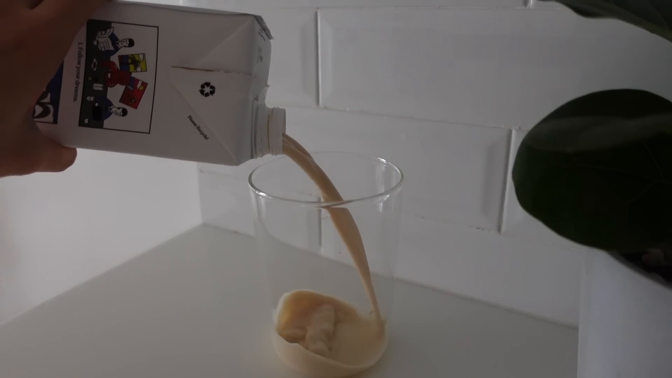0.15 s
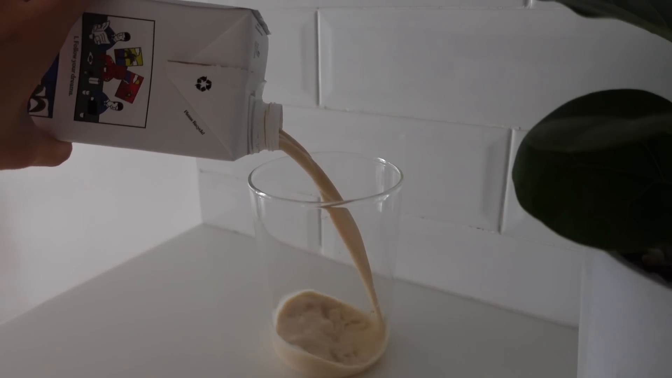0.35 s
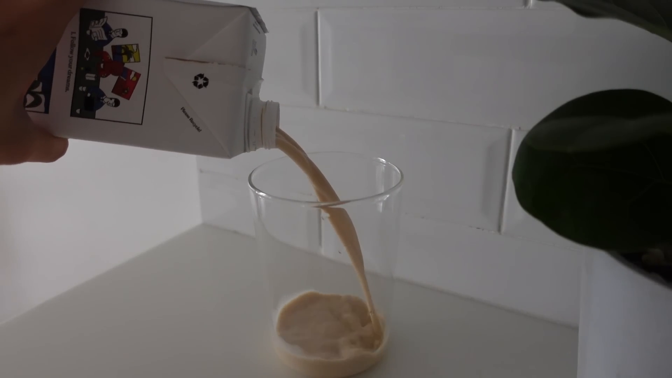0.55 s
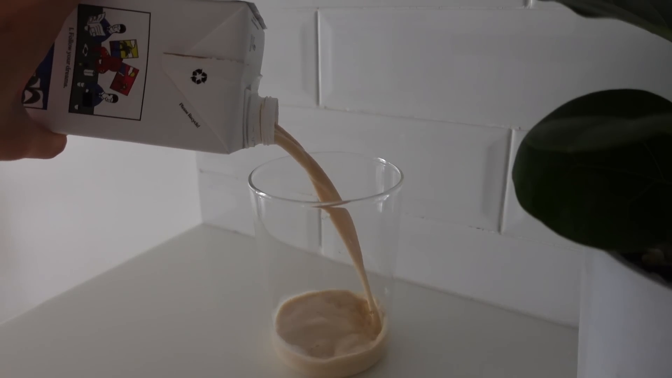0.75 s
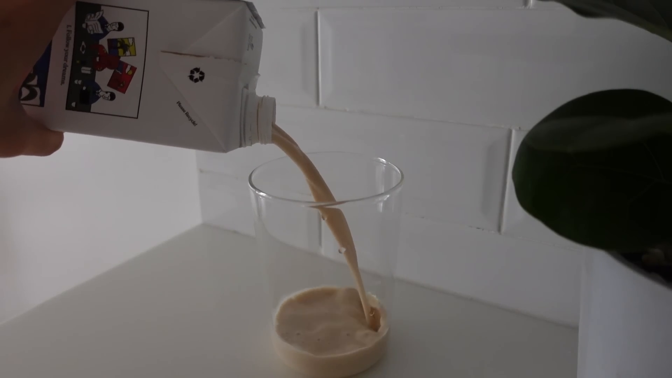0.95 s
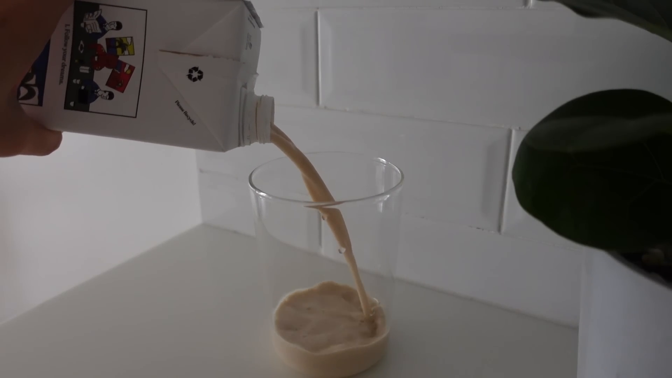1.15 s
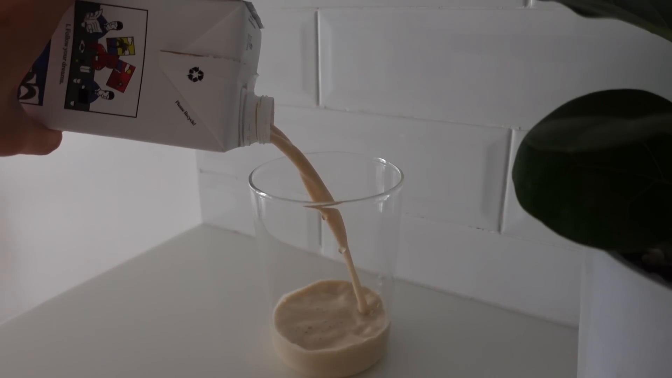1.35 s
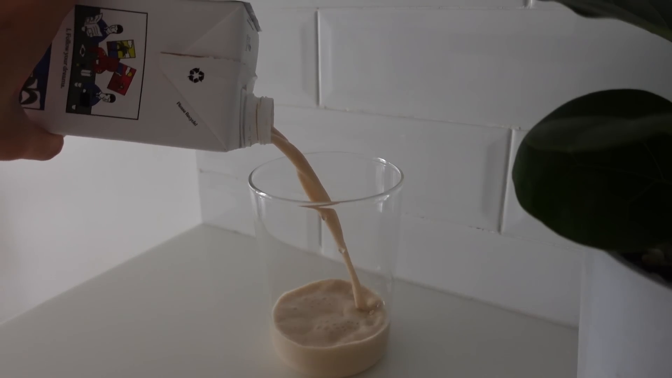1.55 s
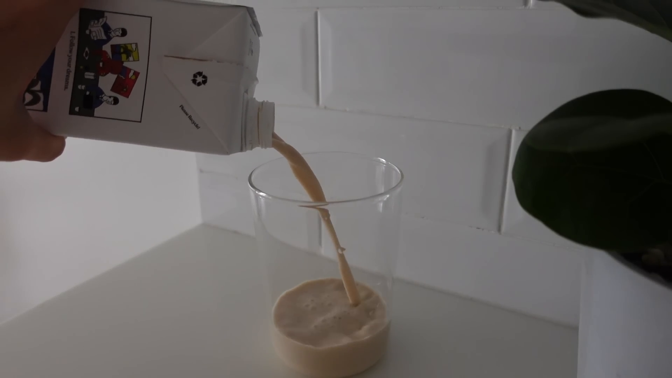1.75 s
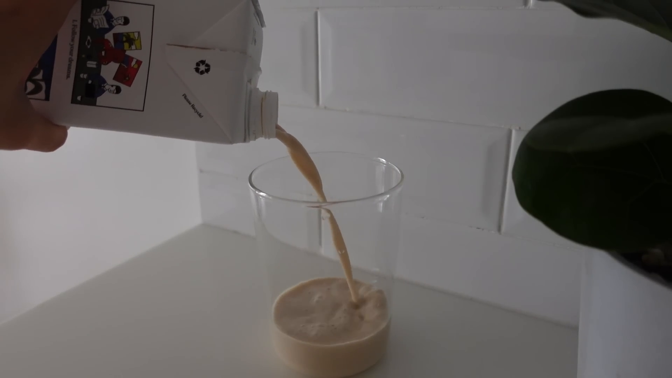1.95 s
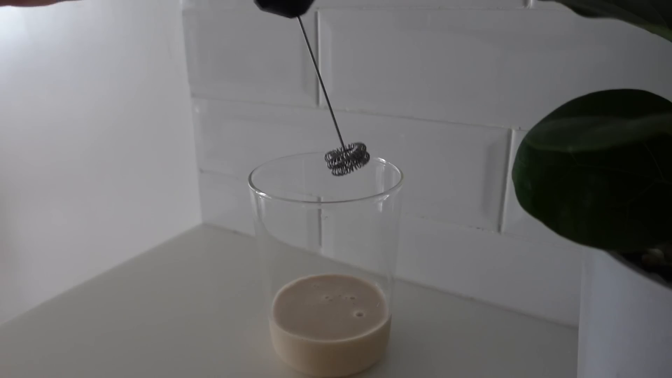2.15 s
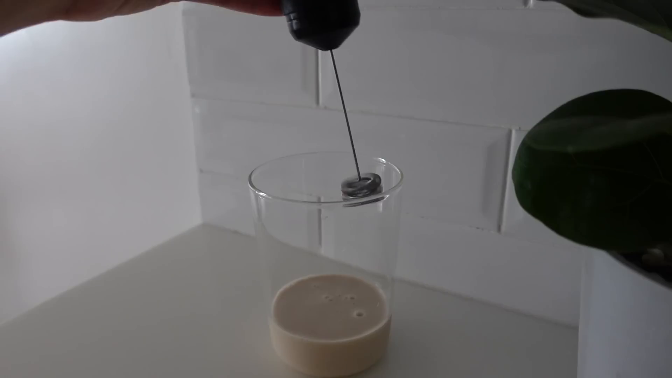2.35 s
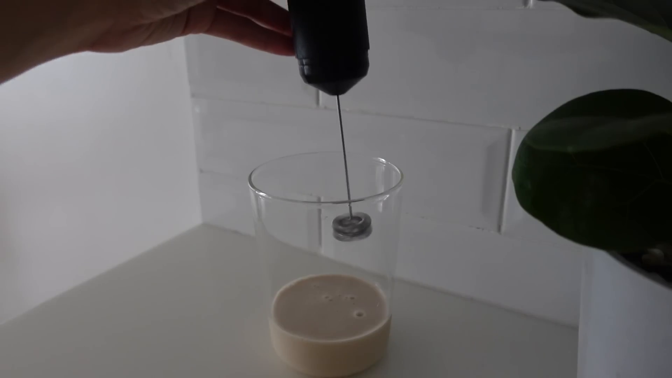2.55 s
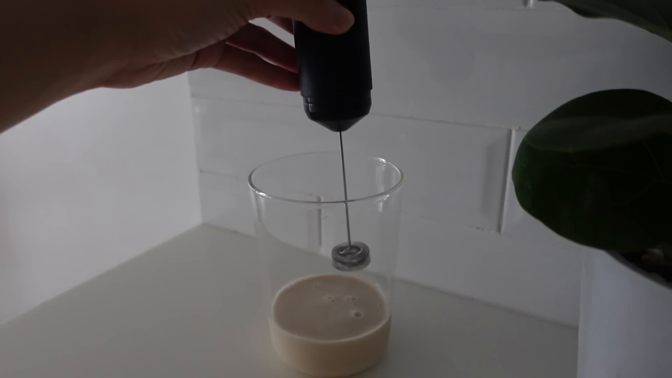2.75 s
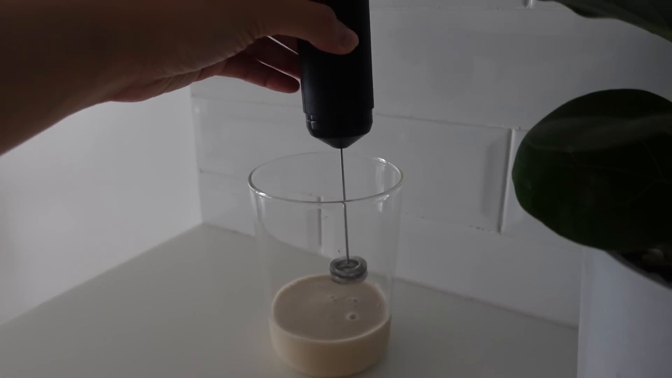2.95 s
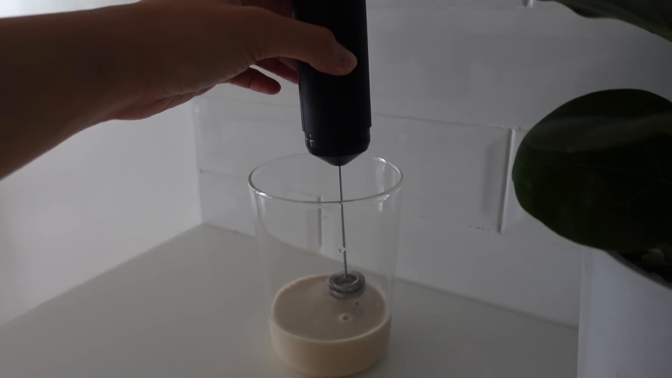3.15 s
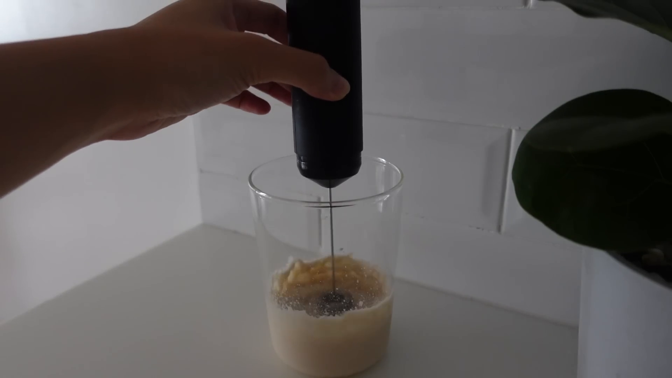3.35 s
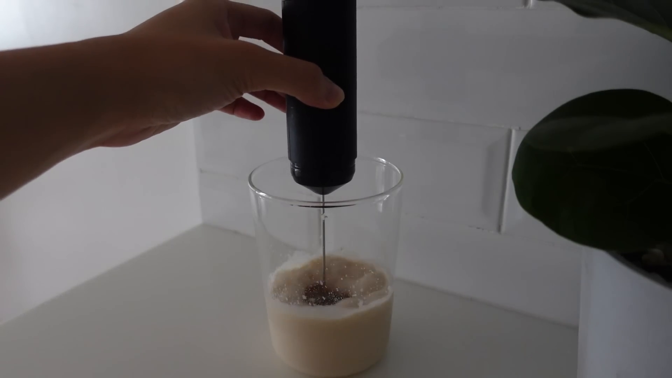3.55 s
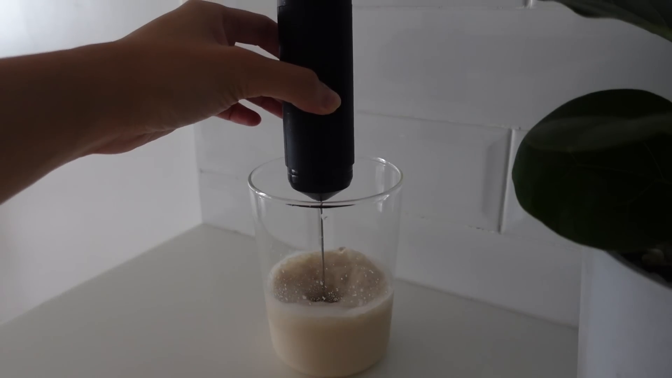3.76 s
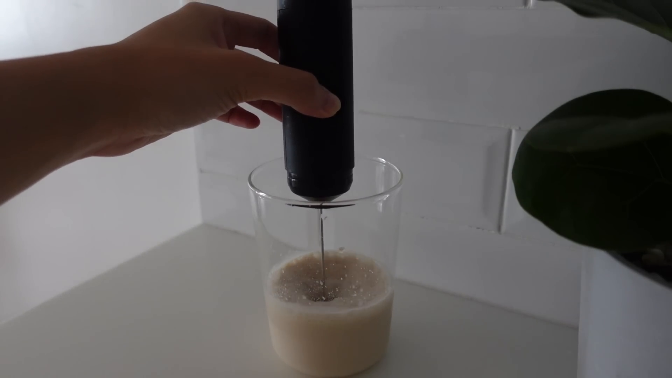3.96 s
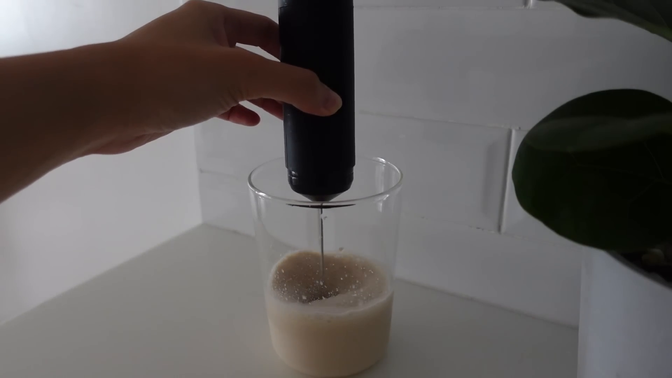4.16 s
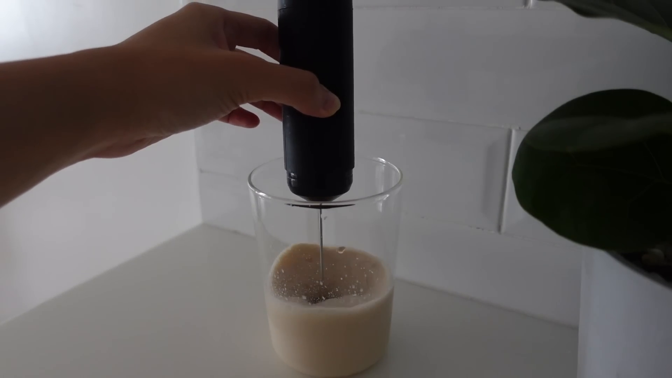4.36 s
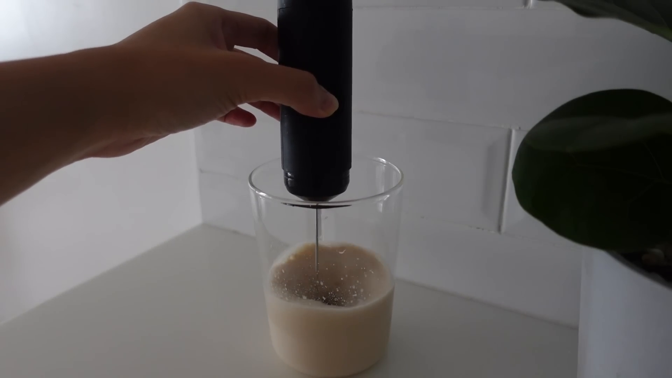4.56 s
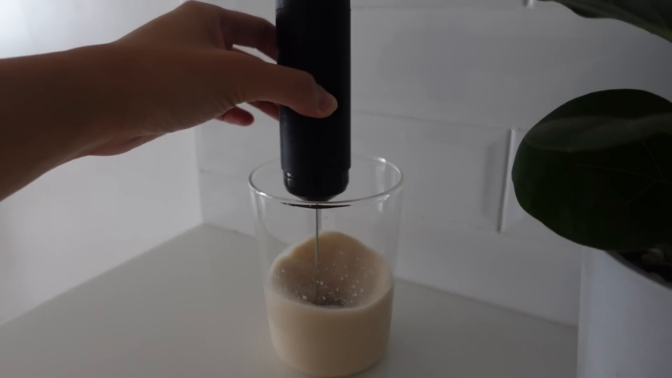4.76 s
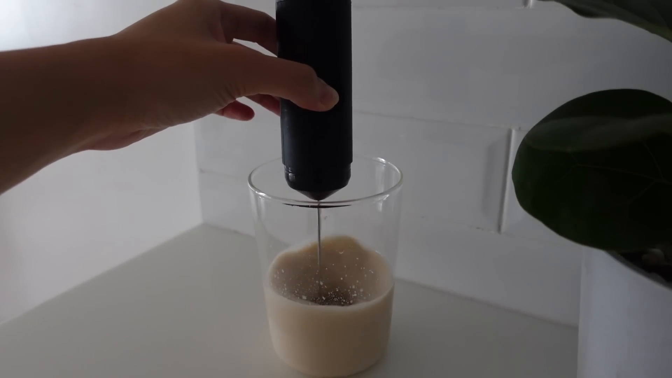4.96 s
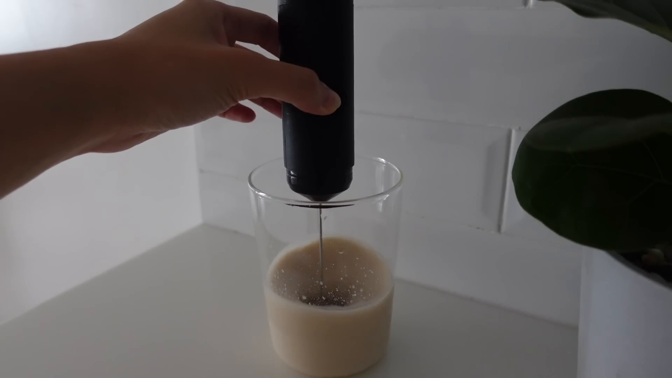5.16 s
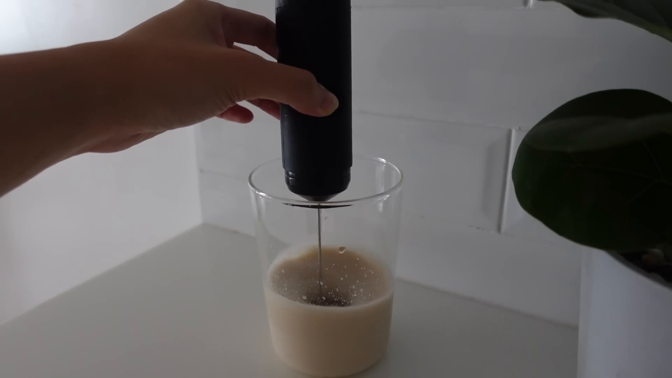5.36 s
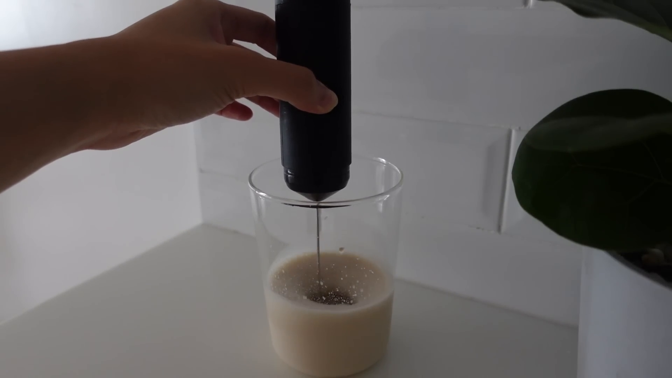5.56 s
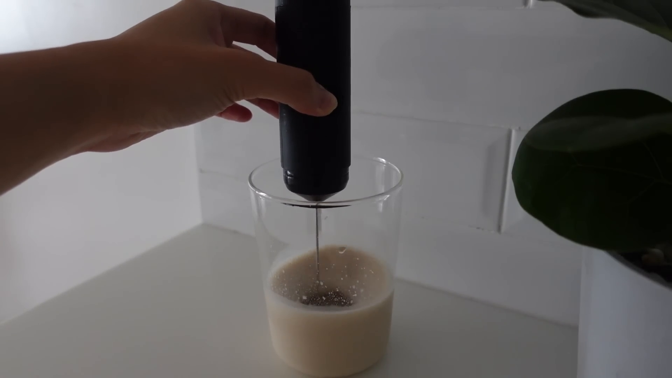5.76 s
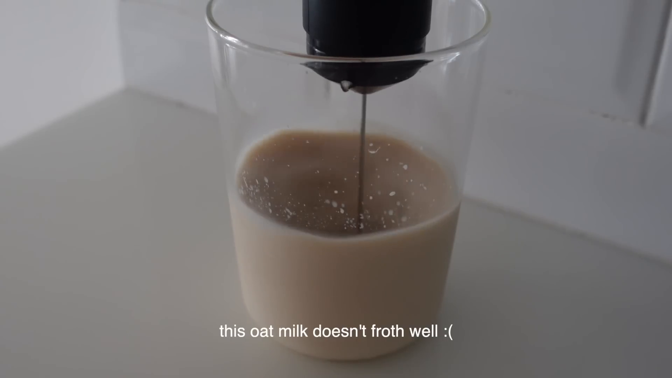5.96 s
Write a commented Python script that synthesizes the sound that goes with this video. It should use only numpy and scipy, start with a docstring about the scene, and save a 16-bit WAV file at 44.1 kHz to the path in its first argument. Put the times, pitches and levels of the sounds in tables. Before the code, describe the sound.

A bubbly, clinking pour into a glass cuts to a handheld milk frother spinning up, dipping in, bogging down and churning the drink.

```python
"""A milky drink is poured from a carton into a glass: damped bubble pulses and noise slaps ring its modes.
After a cut to a quieter shot a handheld frother spins up in air: brush clicks and scrape excite its handle.
It dips in, slows under load and whips the drink: shaped noise and droplets make the spray, churn and gurgle.
A kitchen rumbles softly behind as coloured noise; the drink and frother are placed near the centre, with a
small difference between channels."""
import sys
import numpy as np
from scipy import signal
from scipy.fft import rfft, irfft, next_fast_len
from scipy.io import wavfile
from scipy.ndimage import uniform_filter1d, map_coordinates

SR = 44100
rng = np.random.default_rng(int(sys.argv[2]) if len(sys.argv) > 2 else 0)


def transcribe(signal):
    """Save signal, clipped to [-1, 1], as a 16-bit WAV file at the path in sys.argv[1]."""
    frames = np.atleast_2d(signal).T
    limited = np.clip(frames, -1, 1)
    pcm = np.round(limited * 32767).astype(np.int16)
    wavfile.write(sys.argv[1], SR, pcm)


N = 264600
CUT_S = 2.157  # the first shot ends here


def pour():
    """Forced resonance: bubbles, slaps and a burbling stream drive the modes of the glass."""
    # Bubbles shut in by the stream, later by the plunging whisk.
    # Each row: time in seconds, level before the glass in dB, pitch in Hz.
    bubbles = [(0.0463, -8, 7640), (0.073, -24, 1940), (0.1458, -12, 4860), (0.238, -19.5, 6260),
               (0.252, -20.5, 1860), (0.253, -19.5, 2900), (0.3477, -21.5, 4470), (0.3538, -15.5, 3100),
               (0.453, -13, 4450), (0.4622, -6, 6200), (0.521, -18, 5270), (0.5295, -12.5, 1650),
               (0.5447, -11.5, 6160), (0.5642, -11.5, 5650), (0.5652, -16.5, 1950), (0.6037, -12.5, 2040),
               (0.606, -9.5, 6200), (0.628, -13, 2700), (0.655, -10.5, 5800), (0.6723, -5.5, 5130),
               (.688, -11.5, 5370), (0.707, -9.5, 5360), (0.706, -12.5, 2990), (0.72, -9, 4380),
               (0.756, -2.5, 6110), (0.7624, -23.5, 2670), (0.777, -6, 4560), (0.81, -13.5, 5220),
               (0.825, -12.5, 2670), (0.841, -7.5, 6170), (0.855, -15, 1890), (0.867, -12.5, 2770),
               (.868, -11, 4650), (0.944, -18.5, 1950), (0.957, -13, 5850), (0.974, -20, 2710),
               (0.9872, -12, 5370), (0.9974, -11, 6370), (1.0327, -10, 4540), (1.08, -17, 5280),
               (1.1, -13, 1990), (1.1104, -14.5, 5460), (1.122, -17, 2970), (1.4571, -20.5, 2830),
               (1.508, -21.5, 4680), (1.832, -32, 4640), (1.932, -26.5, 5950), (1.947, -31, 4770),
               (2.112, -26, 1607), (2.113, -23.5, 4730), (3.468, -10.5, 3950), (3.504, -13, 2400),
               (3.522, -6.5, 3850), (3.58, -16, 3800), (3.682, -13, 3560)]
    # Drops slapping the glass. Each row: time in seconds, level before filtering in dB, centre in Hz.
    splats = [(0.045, -13.5, 11400), (0.1447, -12.5, 11900), (.1999, -25, 12700), (0.349, -21.5, 12300),
              (0.605, -19, 9600), (0.6383, -17, 10600), (.824, -18.5, 8600), (3.384, -12.5, 7600),
              (3.409, -6, 6940), (3.4163, -8, 9050), (3.482, -11, 6540), (3.601, -20, 5870)]
    # The steady trickle. Each row: time in seconds, burble level in dB, hiss level in dB.
    stream = [(0, -84, -45), (.25, -70, -51), (.55, -56, -39.5), (.8, -55, -46.5), (.92, -41, -52),
              (1.2, -51.5, -52), (1.4, -61.5, -53.5), (2.157, -60.5, -54.5)]
    # The carton gulps air and the stream surges. Each row: start in seconds, length in seconds, burble in dB.
    glugs = [(.33, 0.079, -54), (.44, 0.022, -45), (.51, 0.016, -37.5), (.6, 0.11, -36.5),
             (.77, 0.12, -36.5), (.94, 0.067, -39), (1.08, 0.037, -39)]
    # Relative spectra of the two stream noises. Each row: frequency in Hz, density in dB per Hz.
    burble_spectrum = [(410, -68), (700, -17), (2680, 2), (3650, -13), (5410, -9), (12000, -51),
                       (22000, -120)]
    hiss_spectrum = [(900, -48), (2000, -7), (6000, 8.5), (16000, -1)]
    # The glass and its air column. Each row: frequency in Hz, width in Hz, relative level in dB.
    glass_modes = [(1690, 50, -7), (2020, 100, -5), (2750, 38, 3), (4760, 80, -1), (5350, 110, 1),
                   (6310, 90, 2), (8300, 160, -10)]
    glass_ring_db, glug_hiss_db = -1, -14.5  # the hiss of a surge is set against its burble

    burble_db, hiss_db, gate = curves(stream)
    glug_db = surges(glugs, rise_db_per_s=515, fall_db_per_s=496)
    s, db, hz = np.transpose(bubbles)
    wet = pops(s, db, hz, cycles=25 + hz / 250, rise=0.056, rough=0.17)
    wet += slaps(bubbles, splats)

    small = swarm(count=3500, hz=4220, octaves=0.645, cycles=40, spread_db=3)
    lumps_db = 3.2 * np.clip(wobble(60), -2, 1)
    burble = .95 * small + .2 * coloured(burble_spectrum)
    wet += gate * amp(np.maximum(burble_db, glug_db) + lumps_db) * burble
    ring = amp(glass_ring_db) * filtered(wet, body(glass_modes))

    # tiny droplets tick in the hiss
    ticks = swarm(count=500, hz=7760, octaves=0.4, cycles=20, spread_db=3.5)
    hiss = coloured(hiss_spectrum) + 0.45 * ticks
    return wet + ring + gate * amp(np.maximum(hiss_db, glug_db + glug_hiss_db)) * hiss


def slaps(bubbles, splats):
    """Impact noise: decaying bursts through a resonance, for drops and the snap as each bubble closes."""
    width_hz = 1950
    splat_t60_s, snap_t60_s = .028, 0.051
    snap_db, snap_pitch = -11.5, 0.96  # against the bubble's level and pitch
    t = np.arange(SR // 10) / SR
    bursts = [(*row, splat_t60_s) for row in splats]
    bursts += [(s, db + snap_db, hz * snap_pitch, snap_t60_s) for s, db, hz in bubbles]
    out = np.zeros(N)
    for s, db, hz, t60 in bursts:
        burst = amp(db - 60 * t / t60) * rng.standard_normal(len(t))
        out[round(s * SR):][:len(t)] += signal.lfilter(*signal.iirpeak(hz, hz / width_hz, SR), burst)
    return out


def pops(s, db, hz, cycles, rise, rough):
    """Damped oscillation of bubbles: t60 of so many cycles, pitch climbing at a rate set by rise."""
    t = np.arange(int(SR * min(1.2 * np.max(cycles / hz), .04))) / SR
    life = t * (hz / cycles)[:, None]  # time as a share of t60
    noise = rng.standard_normal(life.shape)
    noise = uniform_filter1d(uniform_filter1d(noise, size=14, axis=1), size=10, axis=1)
    ruffle = (1 + rough * unit(noise)) / (1 + rough)
    attack = (1 - np.exp(-t / .0006)) ** 2
    tone = np.sin(2 * np.pi * hz[:, None] * t * (1 + rise * life))
    wave = ruffle * amp(db[:, None] - 60 * life) * attack * tone
    at = (s[:, None] * SR).astype(int) + np.arange(len(t))
    train = np.bincount(at.ravel(), wave.ravel(), N + len(t))[:N]
    return filtered(train, lambda f: 1 / (1 + (1100 / (f + 1)) ** 4))  # high-pass, Hz


def swarm(count, hz, octaves, cycles, spread_db):
    """Random superposition: many small bubbles at random times, sizes and pitches, rms 1."""
    u, z = rng.random((count, 2)), rng.standard_normal(count)
    pitch = hz * 2 ** np.clip(octaves * z, -1.3, 1.2)
    db = -spread_db * np.log(u[:, 1] + .02)
    return unit(pops(u[:, 0] * N / SR, db, pitch, cycles, rise=.12, rough=.5))


def surges(rows, rise_db_per_s, fall_db_per_s):
    """Masking by the loudest: each (start, length, dB) event ramps up, holds and ramps down in dB."""
    t = np.arange(N) / SR
    levels = []
    for s, hold, db in rows:
        before, after = np.clip(s - t, 0, None), np.clip(t - s - hold, 0, None)
        levels.append(db - rise_db_per_s * before - fall_db_per_s * after)
    return np.max(levels, axis=0)


def motor():
    """Periodic excitation: three brush clicks a turn shake the handle; load smears them into noise."""
    # The motor in free air. Each row: time in seconds, brush contacts per second.
    spin_up = [(2.33, 150), (2.43, 264), (2.49, 316), (2.56, 396), (2.63, 449), (2.7, 482), (2.79, 508),
               (3, 524), (3.15, 537), (3.26, 540)]
    # The drink holds the whisk back. Each row: time in seconds, share of the free speed.
    load = [(3.262, 1), (3.3, .978), (3.476, .733), (3.53, .655), (5.37, .645), (5.416, .711),
            (5.454, .724), (5.5, .762), (5.55, .82), (5.62, .81), (5.706, .858), (5.76, .824),
            (5.815, .813), (5.82, .745)]
    # Swells of level as it works in the drink. Each row: time in seconds, level change in dB.
    swell = [(3.35, -2), (3.75, -26), (3.95, -13.5), (4.2, 0.5), (4.45, -9), (5.1, -5.5), (5.3, -1),
             (5.37, -7.5), (5.43, 1), (5.52, -1.5), (5.81, -4), (5.825, -20)]
    # The handle's sharp rings. Each row: frequency in Hz, width in Hz, level in dB per pass.
    ring_modes = [(3120, 190, 10), (5100, 260, 2), (6230, 160, 6)]
    switch_s, fade_in_s = 2.325, .045
    full_speed_db, db_per_decade = -26, 36  # reference level, and how it grows with speed
    full_load = .34  # share of the speed lost
    # noisy share of the clicks: running free, added at the start, added under full load
    smear_free, smear_start, smear_load, smear_power = .08, .12, .78, 9

    t, kept = np.arange(N) / SR, curves(load)[0]
    free = curves(spin_up)[0]
    spun, rate = free / free[-1], free * kept
    db = full_speed_db + db_per_decade * np.log10(spun * kept) + curves(swell)[0]
    gate = np.clip((t - switch_s) / fade_in_s, 0, 1)
    smear = smear_free + smear_start * (1 - spun) ** 2
    smear = smear + smear_load * ((1 - kept) / full_load) ** smear_power
    share = np.clip(smear, 0, .85)
    turns = np.cumsum(rate * (1 + .01 * share * wobble(30))) / 3 / SR
    once_a_turn = 1.5 + np.cos(2 * np.pi * turns)

    clicks, even = brush_clicks(turns, rate, spun)
    shell = handle(clicks, brush_scrape(once_a_turn), share, spun)
    # sharp rings sing with the clean clicks, their share greater when the motor is slowed
    ring = filtered(filtered(even, body(ring_modes)), body(ring_modes))
    slowed = np.clip((1 - spun * kept) / full_load, .26, .5)
    shell = shell + slowed * (1 - share) ** 2 * spun ** 2 * ring
    # whine and rattle grow once the shaft turns fast enough
    onset = np.clip((rate - 300) / 140, .12, 1)
    shaft = spun ** 3 * kept ** 7 * shaft_whine(turns) + amp(-13.0) * bearing_rattle(turns, once_a_turn)
    return gate * amp(db) * (1.01 * shell + (1 - share) * onset * shaft)


def each_turn(harmonics, turns):
    """Fourier synthesis: one waveform per shaft turn, read at the shaft's angle."""
    return unit(irfft(np.r_[0, harmonics], 8192))[(turns % 1 * 8192).astype(int)]


def brush_clicks(turns, rate, spun):
    """Harmonic series of the commutator: unequal segments add the shaft orders between even clicks."""
    # The three commutator segments. Each row: size in dB, offset in turns.
    segments = [(0, 0), (-5, .0016), (-2, -.0011)]
    hollow_hz, half_width_hz, depth = 4800, 1250, .7  # the clean clicks are weak in this band
    order = np.arange(1, 130)[:, None]
    size_db, offset = np.transpose(segments)
    phase = np.exp(-2j * np.pi * order * (np.arange(3) / 3 + offset))
    uneven = each_turn(np.sum(amp(size_db) * phase, axis=1), turns) * np.sqrt(rate / 540)
    even = each_turn(order[:, 0] % 3 == 0, turns)
    # the segments strike evenly at first, unevenly once the shaft shakes at speed
    clicks = spun ** 3 * uneven + (1 - spun ** 3) * even * np.sqrt(rate / 540)
    hollow = lambda f: 1 - depth / (1 + ((f - hollow_hz) / half_width_hz) ** 4)
    return filtered(clicks, hollow), even


def brush_scrape(once_a_turn):
    """Friction noise: random contact, amplitude-modulated once a turn."""
    return unit(rng.standard_normal(N) * once_a_turn * amp(2 * wobble(80)))


def handle(clicks, scrape, share, spun):
    """Modal filtering: the plastic handle colours the mixture of clicks and scrape."""
    # The plastic handle. Each row: frequency in Hz, width in Hz, relative level in dB.
    handle_modes = [(449.3, 8.7, -17.5), (3199, 110, -2.5), (4060, 300, -10.5), (5270, 410, -12),
                    (6330, 460, -13), (9210, 480, -14.5), (9980, 99, -4), (10730, 175, 5), (11370, 434, -1),
                    (13500, 3000, -13), (16000, 460, -10.5)]
    treble_hz, treble_power = 7500, 5  # above this the clean share grows with speed to this power
    clean = (1 - share) * np.array([np.ones(N), spun ** treble_power])
    treble = lambda f: 1 / (1 + (treble_hz / (f + 1)) ** 10)
    mixture = np.sqrt(clean) * clicks + np.sqrt(1 - clean) * scrape
    bands = filtered(mixture, lambda f: np.array([1 - treble(f), treble(f)]))
    # the grip shifts, so the partials swell and sink unevenly
    return patchy(unit(filtered(bands.sum(axis=0), body(handle_modes))), depth_db=2.6)


def bearing_rattle(turns, once_a_turn):
    """Impact excitation: the loose rod knocks in its bearing each turn and rings two broad resonances."""
    knocks = each_turn(np.ones(30), turns)
    loose = rng.standard_normal(N) * once_a_turn + .7 * knocks
    return unit(filtered(filtered(loose, body([(2144, 470, 0)])), body([(2640, 1940, 0)])))


def shaft_whine(turns):
    """Order tones: sines locked to multiples of the shaft's rotation."""
    # Shaft orders that sing as clean tones, as multiples of the turning rate.
    orders = [9, 15, 24]
    # Relative level of each order in dB.
    order_db = [-13, -18, -22]
    return sum(amp(db + wobble(8)) * np.sin(2 * np.pi * k * turns) for k, db in zip(orders, order_db))


def whisk():
    """Turbulence noise: fine spray, churning and a low gurgle sound as the whisk works in the drink."""
    # The whisk in the drink. Each row: time in seconds, spray level in dB, churn level in dB.
    stirring = [(3.255, -55, -64), (3.275, -34.5, -64), (3.305, -37.5, -61), (3.33, -32, -68),
                (3.41, -30.5, -44), (3.47, -29.5, -39), (3.6, -32.5, -38), (3.72, -35.5, -37),
                (3.85, -38.5, -47.5), (3.97, -46.5, -41.5), (4.2, -38.5, -35.5), (4.32, -40, -34.5),
                (4.45, -42, -39), (5, -39.5, -36.5), (5.22, -36.5, -39.5), (5.3, -37.5, -35.5),
                (5.5, -40.5, -42.5), (5.6, -36, -39), (5.72, -39, -43.5), (5.81, -41, -39),
                (5.83, -37, -38.5), (6, -36.5, -38.5)]
    # Dips in the colour of the froth. Each row: frequency in Hz, width in Hz, depth from 0 to 1.
    dips = [(3304, 260, 1), (6840, 140, 1)]
    late_s = 5.815  # a last cut changes the colour of the spray

    spray_db, churn_db, gate = curves(stirring)
    late = np.arange(N) / SR > late_s
    # the deeper the whisk sinks, the more the narrow bands stand out in the spray
    deep = curves([(3.5, 0.017), (3.8, 0.91)])[0]
    froth = spray(spray_db, deep, late) + churn(churn_db)
    notch = lambda f, hz, w, d: 1 - np.clip(d, 0, 1) / (1 + (2 * (f - hz) / w) ** 2)
    dipped = filtered(froth, lambda f: np.prod([notch(f, *row) for row in dips], axis=0))
    dip_share = deep * ~late
    return gate * ((1 - dip_share) * froth + dip_share * dipped + gurgle(churn_db))


def spray(spray_db, deep, late):
    """Resonant filtering: mist noise and droplets are heard directly and through narrow bands."""
    # Relative spectrum of the mist. Each row: frequency in Hz, density in dB per Hz.
    mist_spectrum = [(710, -22), (1200, -40), (1400, -17.5), (3050, -6), (3870, -4), (9000, -2),
                     (12500, -5), (16000, -4)]
    # Bands in the sound: froth resonances before the last cut; a band and steady motor tones after it,
    # drawn here as narrow noise. Each row: frequency in Hz, width in Hz, level in dB.
    band_modes = [
        [(3054, 148, 10), (3590, 130, 11.5), (3880, 46, 6.5), (6340, 130, 11.5)],
        [(1950, 110, 19.5), (4440, 76, 6.5), (5030, 63, 1), (7400, 75, 10.5)],
    ]
    # Spray heard outside the bands, in dB: before and after the last cut.
    direct_db = [1, -5]
    drops = swarm(count=7000, hz=6500, octaves=.6, cycles=10, spread_db=2)
    mist = patchy(1.71 * coloured(mist_spectrum), depth_db=3.0) + 0.32 * drops
    before, after = (filtered(mist, body(modes)) for modes in band_modes)
    direct = amp(np.where(late, direct_db[1], direct_db[0])) * mist
    return amp(spray_db + wobble(45)) * (direct + deep * np.where(late, after, before))


def churn(churn_db):
    """Source and filter: noise of uneven strength rings the resonances of the churning."""
    # Resonances of the churning. Each row: frequency in Hz, width in Hz, relative level in dB.
    churn_modes = [(1364, 130, -7), (1560, 170, -4.5), (2026, 373, 0), (2514, 100, 1.5), (3260, 900, -7.5),
                   (3810, 80, -6)]
    slosh = rng.standard_normal(N) * amp(2.5 * wobble(130))
    return amp(churn_db) * unit(filtered(filtered(slosh, body(churn_modes)), body([(2250, 14000, 0)])))


def gurgle(churn_db):
    """Cavity resonance: uneven noise rings the hollow of the vortex, with low swells near 450 Hz."""
    # The hollow of the vortex. Each row: frequency in Hz, width in Hz, relative level in dB.
    hollow_modes = [(290, 70, -6), (447, 55, 0), (680, 160, -9)]
    # Low swells near 450 Hz: gulps of the vortex, and the motor's hum at 5.6 and 5.78 s.
    # Each row: time in seconds, peak level in dB.
    low_swells = [(3.57, -44.5), (4.3, -39.5), (5.286, -41), (5.6, -46.5), (5.78, -44), (5.96, -44.5)]
    # The vortex opens between these times in seconds.
    opening_s = (3.4, 3.8)
    vortex_db, swell_db_per_s = -12.5, 130  # the steady gurgle is set against the churn
    opened = np.interp(np.arange(N) / SR, opening_s, [0, 1])
    swell_db = surges([(s, 0, db) for s, db in low_swells], swell_db_per_s, swell_db_per_s)
    slosh = rng.standard_normal(N) * amp(2.5 * wobble(40))
    level = np.maximum(opened * amp(churn_db + vortex_db), amp(swell_db))
    return level * unit(filtered(filtered(slosh, body(hollow_modes)), body([(445, 800, 0)])))


def walls(x, wide):
    """Reverberation: noise decays at its own rate at each frequency; wide parts the two channels' tails."""
    # Decay of the room. Each row: frequency in Hz, t60 in seconds.
    decay = [(500, 0.52), (3000, 0.059), (12000, 0.12)]
    hz, t, z = signal.stft(rng.standard_normal((2, SR // 3)), SR, nperseg=256)
    tail = signal.istft(z * amp(-60 * t / along(decay, hz)[:, None]), SR, nperseg=256)[1]
    tail = tail[0] + wide * np.array([tail[1], -tail[1]])
    delayed = np.pad(x, (150, 0))[None]  # samples before the tail begins
    return signal.fftconvolve(delayed, tail / np.linalg.norm(tail[0]), axes=1)[:, :N]


def kitchen():
    """Partial coherence: room rumble, louder in the first shot, is split into mid and side noise."""
    # Relative spectra of the rumble, one list for each shot.
    # Each row: frequency in Hz, density in dB per Hz.
    rumble_spectra = [
        [(20, -32), (59, -27.5), (124, 1), (293, -11.5), (1530, -31), (1700, -25.5), (1850, -26.5), (3000, -34),
         (3900, -36.5), (6600, -120)],
        [(20, -26), (70, -40), (98, -6), (168, -5.5), (248, -10.5), (285, -15.5), (367, -18.5), (976, -27.5),
         (16000, -53)],
    ]
    # Relative level of the rumble in each shot, in dB.
    rumble_db = [-39.5, -52]
    # Likeness of left and right. Each row: frequency in Hz, correlation up to 1.
    likeness = [(60, 1), (250, 0.93), (700, 0.26), (2000, 0.91), (8000, 0.32)]
    first = curves([(0, 0), (CUT_S, 0)])[-1]
    turn = lambda hz: np.arccos(np.clip(along(likeness, hz), -1, 1)) / 2
    out = 0
    for spectrum, db, gate in zip(rumble_spectra, rumble_db, (first, 1 - first)):
        pair = np.array([coloured(spectrum), coloured(spectrum)])
        mid, side = filtered(pair, lambda hz: np.array([np.cos(turn(hz)), np.sin(turn(hz))]))
        out = out + gate * amp(db) * np.array([mid + side, mid - side])
    return out


def amp(db):
    """Decibel law: amplitude ratio of a level."""
    return 10 ** (np.asarray(db) / 20)


def unit(x):
    """Normalisation to rms 1."""
    return x / np.sqrt(np.mean(x ** 2) + 1e-20)


def along(points, hz):
    """Interpolation of (Hz, value) points on a logarithmic frequency axis."""
    f, v = np.transpose(points)
    return np.interp(np.log(hz + 1), np.log(f + 1), v)


def curves(rows):
    """Linear interpolation of each column over time, and a gate from the first row to the last or the cut."""
    s, *cols = np.transpose(rows)
    t = np.arange(N) / SR
    gate = uniform_filter1d(1. * (t >= s[0]) * (t <= max(s[-1], CUT_S)), size=128)
    return [np.interp(t, s, c) for c in cols] + [gate]


def wobble(rate):
    """Band-limited fluctuation: a smooth random curve with rate knots a second."""
    return map_coordinates(rng.standard_normal(int(N * rate / SR) + 4), [np.arange(N) * rate / SR])


def filtered(x, response):
    """Linear filtering: the spectrum of x times a complex response of frequency."""
    m = next_fast_len(N + SR // 2)
    return irfft(rfft(x, m) * response(np.fft.rfftfreq(m, 1 / SR)), m)[..., :N]


def body(modes):
    """Modal superposition: the response of (Hz, width Hz, dB) resonances of alternating sign."""
    def response(f):
        return sum((-1) ** k * amp(db) * 1j * f * w / (c * c - f * f + 1j * f * w)
                   for k, (c, w, db) in enumerate(modes))
    return response


def coloured(spectrum):
    """Spectral shaping: noise of rms 1 with a given spectrum."""
    return unit(filtered(rng.standard_normal(N), lambda hz: amp(along(spectrum, hz))))


def patchy(x, depth_db):
    """Time-frequency modulation: a random gain drifts over frequency and time."""
    z = signal.stft(x, nperseg=1024)[2]
    field = uniform_filter1d(rng.standard_normal(z.shape), size=10, axis=0)
    field = uniform_filter1d(field, size=14, axis=1)
    return signal.istft(z * amp(depth_db * unit(field)), nperseg=1024)[1][:N]


def scene():
    """Superposition of direct sound, room tail and rumble; the cut silences the echo of the pour."""
    wet, froth = pour(), motor() + whisk()
    # the pour and the frother are heard without deep bass
    wet, froth = filtered(np.array([wet, froth]), lambda f: 1 / (1 + (200 / (f + 1)) ** 4))
    # no wet echo in the second after the cut
    echo_open = np.abs(np.arange(N) / SR - CUT_S - .5) > .5
    room = walls(wet, wide=0.098) * echo_open + walls(froth, wide=0.011)
    balance = amp([[-.1], [.1]])  # left, right
    return (wet + froth) * balance + amp(-9.5) * room + kitchen()


def record(dry):
    """Band limitation: a steep low-pass removes the highest treble."""
    top_hz = 15730
    return filtered(dry, lambda hz: 1 / (1 + (hz / top_hz) ** 1000))


dry = scene()
out = record(dry)
transcribe(out)
```